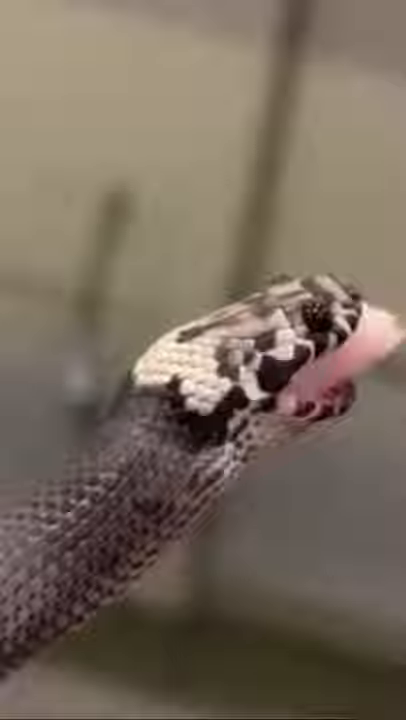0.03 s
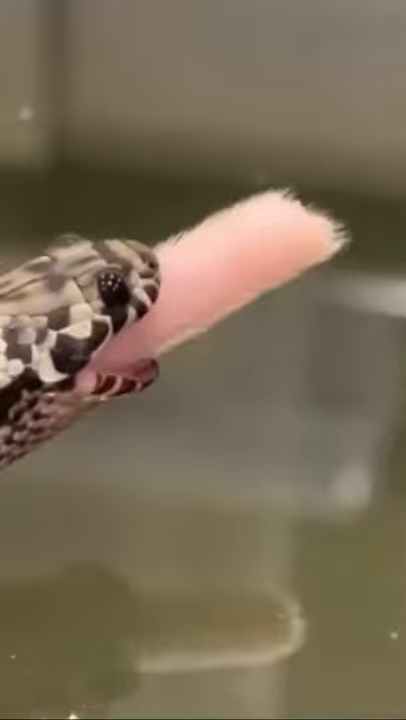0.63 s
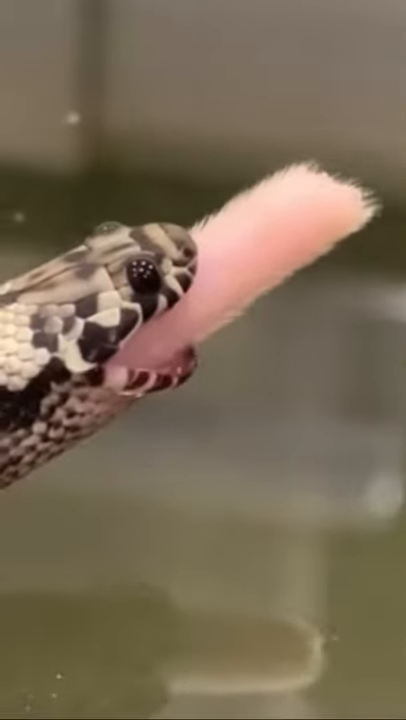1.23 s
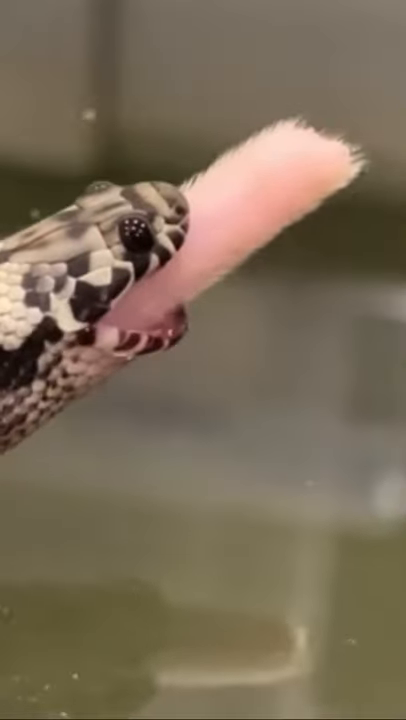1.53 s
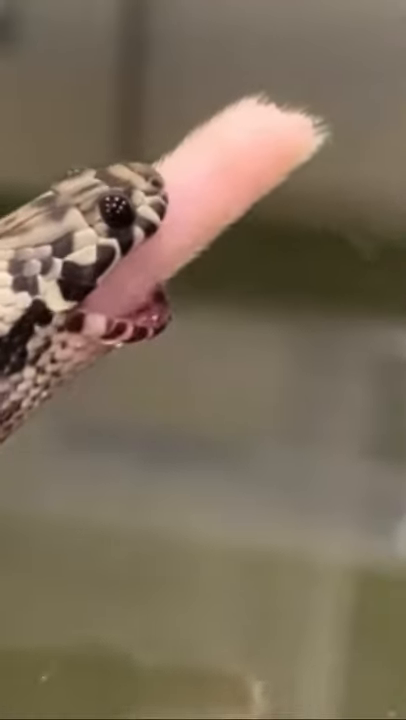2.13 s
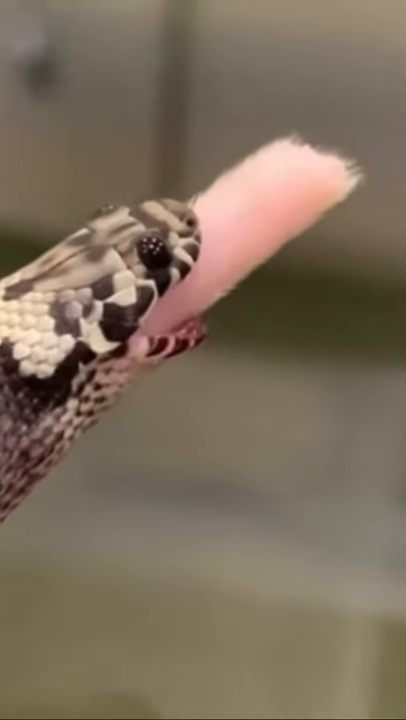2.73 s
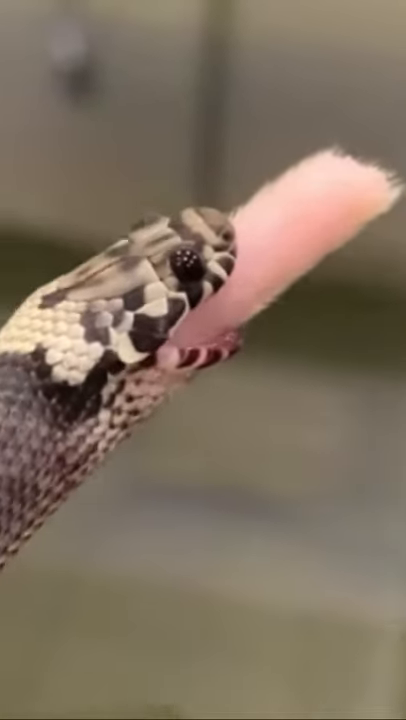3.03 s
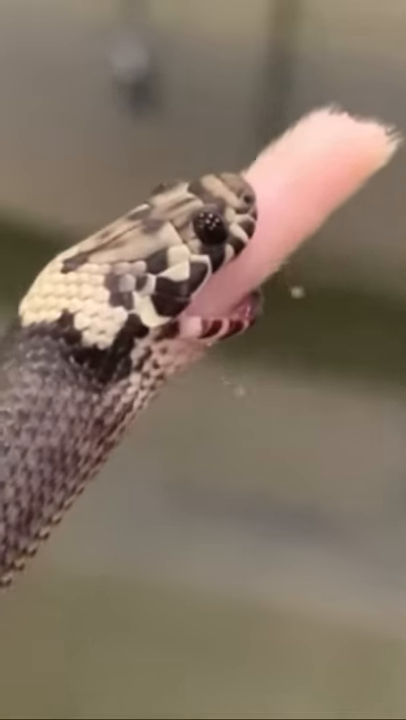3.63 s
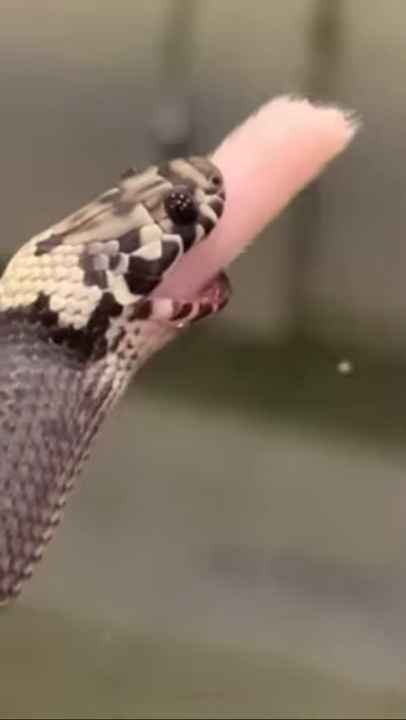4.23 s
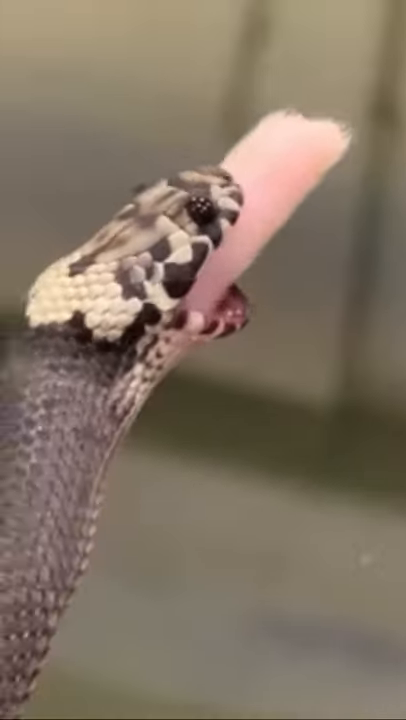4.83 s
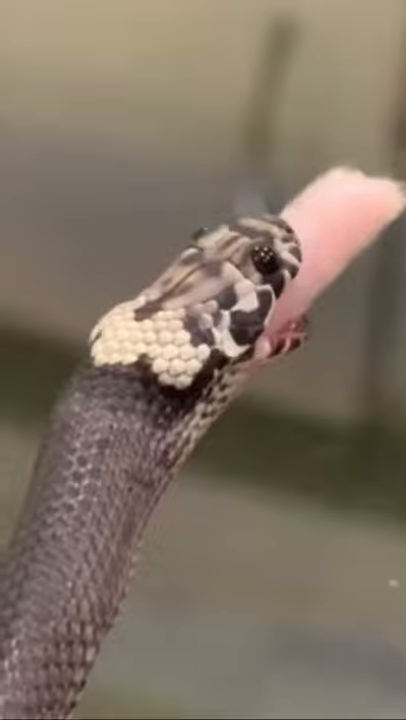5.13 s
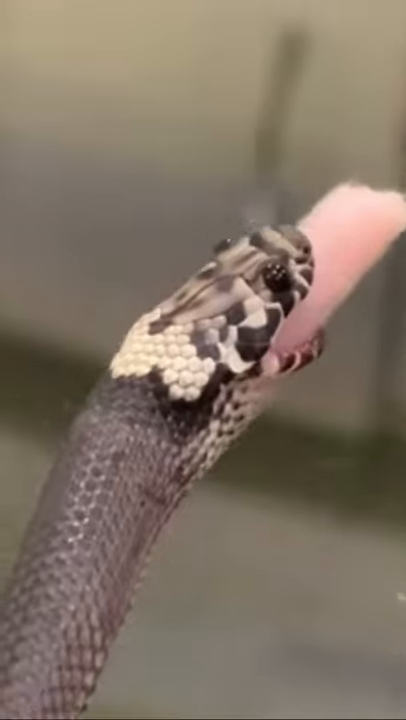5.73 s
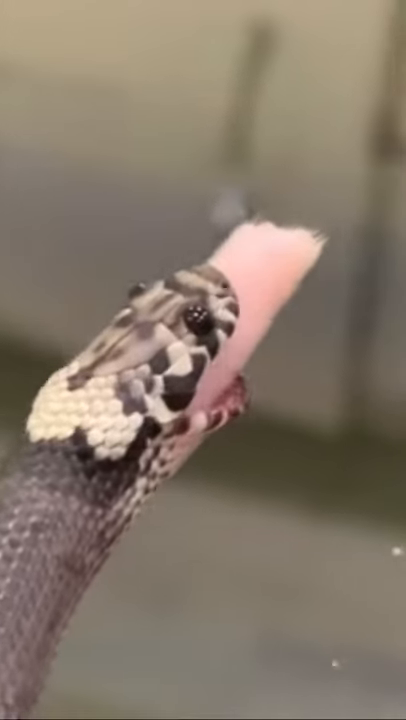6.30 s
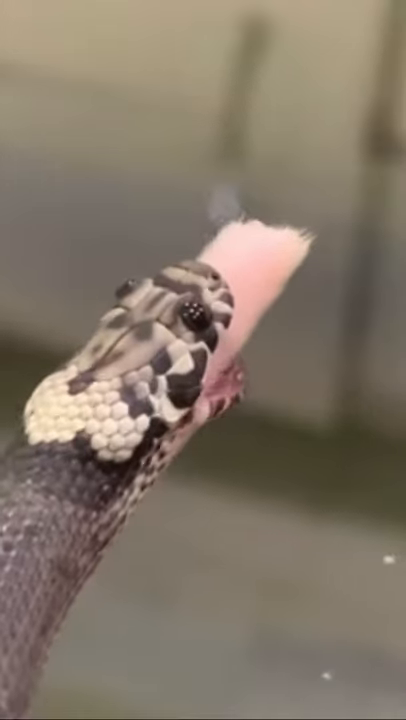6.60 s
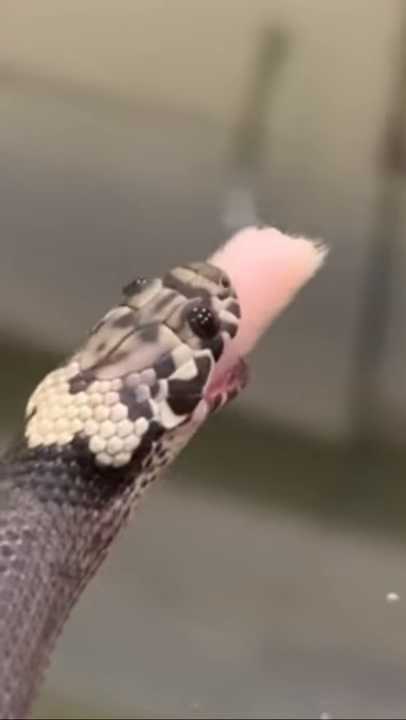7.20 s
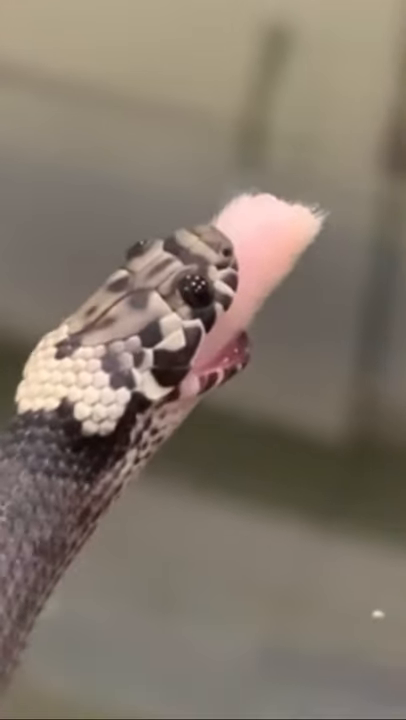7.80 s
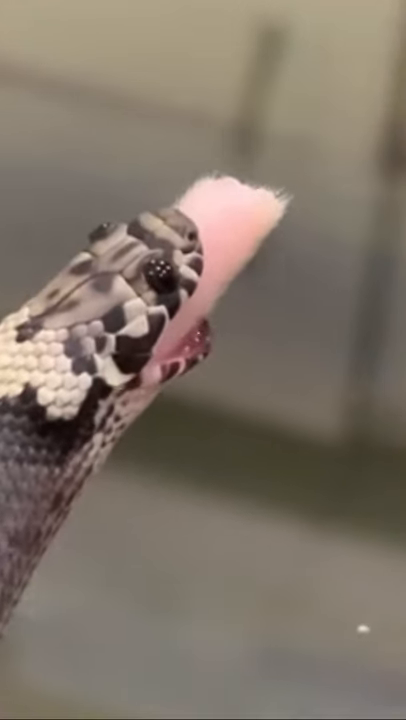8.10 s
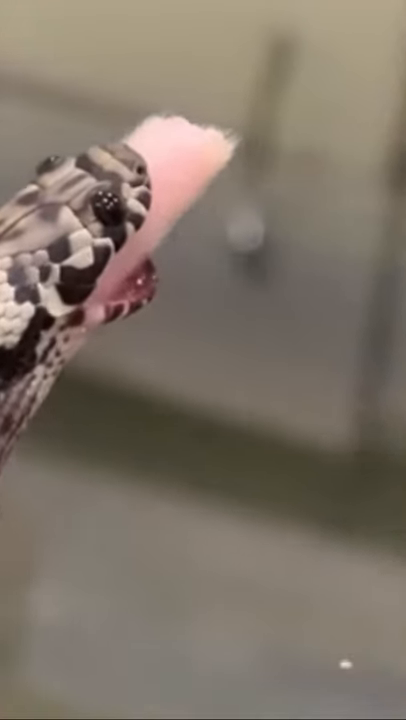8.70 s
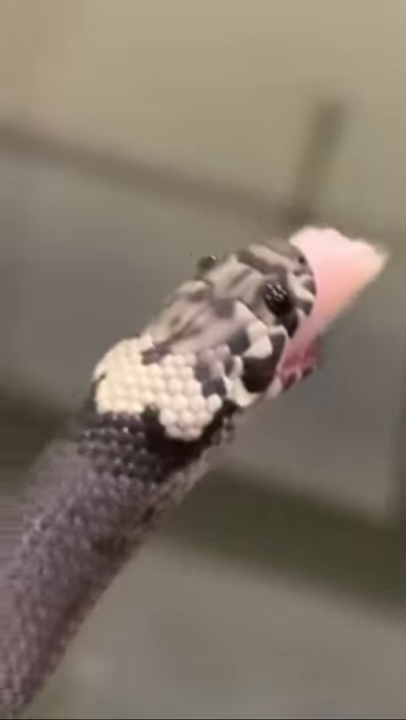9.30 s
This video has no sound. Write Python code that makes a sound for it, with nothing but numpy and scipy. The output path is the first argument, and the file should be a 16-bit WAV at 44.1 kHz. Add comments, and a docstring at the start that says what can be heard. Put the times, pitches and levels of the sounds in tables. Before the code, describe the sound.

A quiet indoor hum with soft knocks, ticks and dull thuds, then a vehicle passes outside with a swelling rumble and tyre roar.

```python
"""A quiet room, where an appliance hums and a small fan rushes softly, heard by two close microphones.
Something knocks softly three times, 2.2 s apart, among dull thuds, faint squeaks and a few ticks,
one of them sharp. Then a vehicle passes outside. Its engine rumble and tyre roar make the room ring
at its own notes (resonances). The hiss is brightest as it goes by, and the roar then drops in pitch."""
import sys
import numpy as np
from scipy import signal
from scipy.fft import rfft, irfft, next_fast_len
from scipy.io import wavfile
from scipy.ndimage import uniform_filter1d

SR = 44100
rng = np.random.default_rng(int(sys.argv[2]) if len(sys.argv) > 2 else 0)


def transcribe(signal):
    """Save signal, clipped to [-1, 1], as a 16-bit WAV file at the path in sys.argv[1]."""
    frames = np.atleast_2d(signal).T
    limited = np.clip(frames, -1, 1)
    pcm = np.round(limited * 32767).astype(np.int16)
    wavfile.write(sys.argv[1], SR, pcm)


N = 412335
FFT_SIZE = next_fast_len(N)
TIME = np.arange(N) / SR
FREQ = np.fft.rfftfreq(FFT_SIZE, 1 / SR)

# the notes at which the room rings: f/Hz, width/Hz, boost/dB
ROOM_RESONANCES = [(114.5, 9.9, 10.5), (165.3, 19, 10), (202, 15, 7), (237.8, 9.8, 8), (278.8, 16.8, 11.5),
                   (330, 46, 1), (375.6, 15, 6), (468.3, 22, 10.5), (514, 14, 9.5), (551, 22, 6),
                   (618, 9.4, 12.5), (665, 60, 6.5), (734.4, 25, 11.5), (768, 27, 8.5), (800.5, 20, 9),
                   (834.3, 21, 10.5), (886, 30, 4.5), (927, 39, 7), (995, 14, 5), (1041, 18, 7),
                   (1165, 14, 7.5), (1560, 14, -4), (2480, 180, 3.5)]
# how alike the microphones hear room and street sound: f/Hz, likeness (1 same, -1 opposite)
ROOM_LIKENESS = [(450, 1), (570, 0.97), (760, 0.25), (1200, 0.25), (1800, -0.11), (3300, -0.25),
                 (4500, 0.55), (5600, -0.85), (6500, 0.39), (7300, -0.83), (8800, 1), (10600, 0.34),
                 (11900, -0.27), (14500, 0)]
STREET_LIKENESS = [(100, 1), (280, 0.94), (480, 0.63), (700, 1), (900, 0.7), (1300, 0.25), (2200, 0.039),
                   (3500, 0.07)]
# how much louder the street is on the left: f/Hz, level/dB
STREET_LEFT_BOOST = [(400, 0), (600, 2.5), (800, 8.5), (1000, 2.5), (1400, 1.5), (3000, -1.5)]
# how much sooner the street is heard on the left: f/Hz, t/s
STREET_LEFT_LEAD = [(150, 0.000062), (380, .00018), (560, 0.00038), (800, 0.00021), (1100, 0.00043),
                    (2200, 0.000398)]

# tone of the room's steady air, far traffic and the building's rumble: f/Hz, relative level/dB
AIR_SPECTRUM = [(15, -105), (36, -89), (50, -85), (78, -80), (125, -85.5), (200, -88.5), (440, -99),
                (680, -102), (1200, -117), (1700, -114), (2200, -120), (6000, -125), (9300, -122),
                (12000, -126), (14500, -129)]
TRAFFIC_SPECTRUM = [(300, -21), (480, 2), (680, -5.5), (880, -3.5), (1100, -14.5), (2000, -36)]
RUMBLE_SPECTRUM = [(18, -24.5), (36, -12), (49, 1), (58, -2.5), (73, 3), (83, -1), (92, 1.5), (130, -12.5),
                   (250, -61.5)]
# moments when the far traffic and the rumble swell: t/s, level/dB, width/s
TRAFFIC_SWELLS = [(0.6, -88, 0.51), (1.42, -78, 0.085), (4.15, -76.5, 0.17), (5.5, -78.5, 0.58),
                  (5.82, -73, 0.086), (6.45, -68, 0.22)]
RUMBLE_SWELLS = [(3.2, -63.5, 0.56), (4.0, -54.5, 0.16)]
# the tones in the hum: multiple of its pitch, relative level/dB
HUM_TONES = [(.5, -66), (1, -49), (1.5, -69)]
# brief dips and lifts of the hum: t/s, level change/dB, width/s
HUM_WAVERS = [(7.5, -3, 0.077), (8.245, 2, 0.099), (8.47, -3, 0.071), (8.924, 6, 0.024)]

# faint squeaks: t/s, level/dB, f/Hz, width/Hz, width/s
SQUEAKS = [(0.298, -83, 6260, 170, 0.018), (0.58, -83, 4700, 130, .022), (7.64, -77, 6000, 220, 0.055)]
# soft thuds: t/s, level/dB, f/Hz
THUDS = [(0.43, -64.5, 430), (1.33, -66, 560), (1.79, -67.5, 490), (2.45, -65, 540), (4.085, -62, 380),
         (5.96, -60, 470)]
# ticks: t/s, relative level/dB
TICKS = [(1.1449, -46), (2.1801, -67), (2.3433, -67), (2.691, -68.5)]
# echoes of each tick: delay/s, relative level/dB
TICK_ECHOES = [(0.0105, -14), (0.015, -10)]
# tone of a tick, a knock's rattle, and the tail each leaves in the room: f/Hz, relative level/dB
TICK_SPECTRUM = [(400, -3), (800, 2), (1500, 0), (2400, 6), (3000, 3), (4100, 6), (5100, -3), (6000, 5),
                 (7500, -8), (10000, -7), (14000, -19)]
TICK_TAIL_SPECTRUM = [(400, -6), (800, 3), (1800, -1), (2700, -3), (4100, 2), (5200, -10), (6200, -4),
                      (8000, -20), (14000, -32)]
RATTLE_SPECTRUM = [(300, -34), (600, -8), (950, -14.5), (1230, -4.5), (1560, -2.5), (1950, -7.5),
                   (2230, -12.5), (2550, -38), (5000, -61)]
KNOCK_TAIL_SPECTRUM = [(350, -18), (550, -3), (900, -6), (1250, 3), (1600, -3), (2100, -12), (2600, -43)]
# soft rattling knocks: t/s, level/dB, extra hollow sound/dB, rise/s
KNOCKS = [(1.6348, -57.5, -1, 0.011), (3.8377, -59, -5, 0.014), (6.0417, -59, -6.5, 0.012)]
# the quick hits within one knock: delay/s, relative level/dB, hollow sound/dB
KNOCK_HITS = [(0.003, 3.5, -4), (0.017, 1.5, 1), (0.041, -3, 1.5), (0.06, -5, -3)]
# the notes each hit rings with: f/Hz, relative level/dB, time to fade by 60 dB/s
KNOCK_NOTES = [(1197, -5, 0.054), (1387, -15, 0.23), (1538, 4.5, 0.076), (1881, 0.5, 0.069)]

# tone of the vehicle's sounds as heard indoors: f/Hz, relative level/dB
ENGINE_SPECTRUM = [(60, -27), (120, -10), (165, -1), (260, -2.5), (380, -4), (500, -13.5), (900, -72)]
TYRE_SPECTRUM = [(250, -23), (470, -5), (580, -7), (665, 2), (735, -3.5), (787, 0), (850, -4.5),
                 (960, -4.5), (1130, -12.5), (1500, -38), (3000, -64)]
ROAD_SPECTRUM = [(600, -17), (950, 4.5), (1100, 3.5), (1400, 4), (1900, 3.5), (2400, -2.5), (2750, -7),
                 (3100, -8), (3900, -11), (4800, -13.5), (7000, -63), (14000, -50)]
SPRAY_SPECTRUM = [(2000, 11.5), (3800, 14), (5000, 0.5), (6500, 6.5), (8000, 1), (10000, -2.5),
                  (14000, -37)]
BUMP_SPECTRUM = [(300, -24), (460, -1.5), (570, 0), (660, -7), (735, 2), (800, 3), (900, 1.5), (1000, -13),
                 (1400, -47)]
# the engine revs and the wheels cross bumps: t/s, level/dB, width/s
ENGINE_REVS = [(7.54, -48.5, 0.026), (8.92, -56, 0.32)]
WHEEL_BUMPS = [(7.41, -57, 0.015), (7.7, -55.5, 0.02), (7.925, -46.5, 0.026), (8.1, -56, 0.03),
               (8.276, -51, 0.016), (8.55, -51, 0.035)]
# short droning surges from the street, the first from far traffic, the rest from the vehicle: t/s, level/dB,
# width/s, f/Hz, width/Hz
DRONES = [(5.069, -68, 0.05, 655, 35), (6.516, -56.5, 0.034, 190, 35), (7.127, -54, 0.13, 843, 9.9),
          (7.4, -57, 0.066, 760, 82), (7.7, -52, 0.025, 720, 16), (7.78, -49.5, 0.042, 160, 13.5),
          (8.326, -53.5, 0.057, 620, 9), (8.594, -49.5, 0.059, 736, 16), (9.23, -53.5, 0.22, 166, 24)]

# when the vehicle is nearest, and how long it takes to drive as far as it then is from the room
CLOSEST_S, CROSSING_S = 7.42, 1.066
EMERGE_START_S, EMERGE_LENGTH_S = 3.95, 2.1  # it comes out from behind cover


def gain_of(db):
    """Turns decibels into a number to multiply a sound by."""
    return 10 ** (np.asarray(db) / 20)


def unit_level(x):
    """Scales a signal to an average (rms) size of 1."""
    return x / np.sqrt(np.mean(x ** 2) + 1e-30)


def curve(points):
    """Joins (f/Hz, value) points into a line, giving each octave equal room."""
    hz, value = np.transpose(points)
    return np.interp(np.log(FREQ + 1), np.log(hz + 1), value)


def shape(spectrum):
    """Turns (f/Hz, level/dB) points into a gain for every frequency."""
    return gain_of(curve(spectrum))


def bell(x, centre, width):
    """A smooth hump of height 1."""
    return np.exp(-.5 * ((x - centre) / width) ** 2)


def swells(rows):
    """A gain that rises and falls smoothly once for each row."""
    return sum(gain_of(db) * bell(TIME, s, width) for s, db, width in rows)


def dying(s, rise, t60):
    """A gain lasting one second: it rises at time s and loses 60 dB every t60 seconds."""
    envelope, age = np.zeros(N), TIME[:SR]
    envelope[round(s * SR):][:SR] = np.minimum(age / rise, 1) * gain_of(-60 * age / t60)
    return envelope


def drift(top_hz):
    """Slow random wandering of average size 1."""
    t = TIME[::256]
    rates = np.geomspace(top_hz / 10, top_hz, 20)
    waves = sum(np.sin(2 * np.pi * (hz * t + rng.random())) for hz in rates)
    return np.interp(TIME, t, unit_level(waves))


def filtered(x, gain):
    """Turns each frequency of a sound up or down by its gain."""
    return irfft(rfft(x, FFT_SIZE) * gain, FFT_SIZE)[..., :N]


def noise(gain, likeness, lead_s=0, left_db=0):
    """Noise at two microphones: partly alike, and perhaps sooner and louder on the left."""
    same = np.clip(likeness, -1, 1)
    left, other = rfft(rng.standard_normal((2, FFT_SIZE)))
    right = (same * left + np.sqrt(1 - same ** 2) * other) * np.exp(-2j * np.pi * FREQ * lead_s)
    pair = np.array([left * gain_of(left_db / 2), right * gain_of(-left_db / 2)])
    return irfft(pair * gain, FFT_SIZE)[:, :N] * np.sqrt(SR / 2)


def room_colour():
    """The gain for each frequency: the room favours its own notes."""
    boosts = sum((gain_of(db) ** 2 - 1) / (1 + (2 * (FREQ - hz) / width) ** 2) ** 2
                 for hz, width, db in ROOM_RESONANCES)
    return np.sqrt(np.abs(1 + boosts))


def indoors(gain):
    """Noise of size 1 from within the room."""
    return unit_level(noise(gain, curve(ROOM_LIKENESS)))


def street_noise(gain):
    """Noise from the street, which lies to the left."""
    return noise(gain, curve(STREET_LIKENESS), curve(STREET_LEFT_LEAD), curve(STREET_LEFT_BOOST))


def outdoors(spectrum, colour, pitch=1):
    """Street noise of size 1, bent in pitch by motion and then coloured by the room."""
    top = np.max(pitch)
    street = street_noise(shape([(hz * top, db) for hz, db in spectrum]))
    position = np.cumsum(pitch / top * np.ones(N))  # a source moving away is heard slowed down
    bent = np.array([np.interp(position, np.arange(N), side) for side in street])
    return unit_level(filtered(bent, colour))


def passing(closest_db, doubling_db, rear_db):
    """Gain of a passing sound: doubling_db less at twice the distance, up to rear_db more behind."""
    along = (TIME - CLOSEST_S) / CROSSING_S
    distance = np.hypot(1, along)
    emerged = np.clip((TIME - EMERGE_START_S) / EMERGE_LENGTH_S, 0, 1)
    return emerged * gain_of(closest_db - doubling_db * np.log2(distance) + rear_db * along / distance)


def room_air(fan_hz=1726, fan_width_hz=123, traffic_db=-84.5):
    """Steady air, the fan's fluttering whirr and the murmur of far traffic."""
    colour = room_colour() ** 0.14  # only a hint of the room's ring
    air = noise(shape(AIR_SPECTRUM) * colour, curve(ROOM_LIKENESS))
    fan = noise(gain_of(-101) * bell(FREQ, fan_hz, fan_width_hz), curve(ROOM_LIKENESS))
    flutter = gain_of(drift(12))
    murmur = np.hypot(gain_of(traffic_db + 2.8 * drift(7)), swells(TRAFFIC_SWELLS))
    return air + fan * flutter + indoors(shape(TRAFFIC_SPECTRUM) * colour) * murmur


def hum(pitch_hz=100, trim_db=-0.82, grow_at_s=5.64, grow_for_s=0.92):
    """An appliance hums at twice the mains frequency, with a weak tone below and another above."""
    angle = 2 * np.pi * (pitch_hz * TIME + 0.0027 * drift(1.1))
    tones = sum(gain_of(db) * np.sin(k * angle + 2 * np.pi * rng.random()) for k, db in HUM_TONES)
    growth_db = 2.4 * np.clip((TIME - grow_at_s) / grow_for_s, 0, 1)
    waver_db = sum(db * bell(TIME, s, width) for s, db, width in HUM_WAVERS) + 0.5 * drift(5)
    return np.sqrt(2) * tones * gain_of(trim_db + growth_db + waver_db)


def bass(rumble_db=-67.5, boom_hz=90.4, spread_rad=0.34):
    """The hum, the building's rumble and the engine's boom, nearly alike at both microphones."""
    vehicle_shake = passing(-56, doubling_db=8.2, rear_db=0.86)
    shaking = np.sqrt(gain_of(rumble_db) ** 2 + swells(RUMBLE_SWELLS) ** 2 + vehicle_shake ** 2)
    boom = passing(-59.5, doubling_db=10, rear_db=3)
    low = hum() + indoors(shape(RUMBLE_SPECTRUM)) * shaking
    low += indoors(bell(FREQ, boom_hz, width=9.5)) * boom
    # left and right slip a little out of step while the vehicle is near
    spread = spread_rad * (boom / boom.max()) ** 2 * np.array([[-.5], [.5]])
    return (signal.hilbert(low, FFT_SIZE)[:, :N] * np.exp(1j * spread)).real


def squeaks():
    """Brief, thin, high rubbing noises."""
    return sum(gain_of(db) * indoors(bell(FREQ, hz, width_hz)) * bell(TIME, s, width_s)
               for s, db, hz, width_hz, width_s in SQUEAKS)


def thuds():
    """Soft, dull bumps somewhere in the building."""
    return sum(gain_of(db) * indoors(bell(FREQ, hz, width=110)) * dying(s, rise=0.02, t60=0.25)
               for s, db, hz in THUDS)


def ticks(ring_db=-13, tail_db=-23):
    """A close snap rings for an instant; nearby surfaces return two echoes and a short, duller tail."""
    colour = shape(TICK_SPECTRUM)
    clicks = np.zeros(N)
    for s, db in TICKS:
        clicks[round(s * SR)] = gain_of(db)
    snaps = filtered(clicks, colour / colour.mean())
    rings = sum(gain_of(db + ring_db + echo_db) * dying(s + delay, rise=0.00016, t60=0.019)
                for s, db in TICKS for delay, echo_db in [(0, 0)] + TICK_ECHOES)
    tails = sum(gain_of(db + tail_db) * dying(s, rise=0.0011, t60=0.14) for s, db in TICKS)
    return snaps + indoors(colour) * rings + indoors(shape(TICK_TAIL_SPECTRUM)) * tails


def knock(rise, body_db, body_hz=680, ring_db=-3, tail_db=-14):
    """A mechanism across the room knocks and bounces; a duller tail lingers."""
    rattle = indoors(shape(RATTLE_SPECTRUM))
    body = indoors(bell(FREQ, body_hz, width=93))
    sound = indoors(shape(KNOCK_TAIL_SPECTRUM)) * gain_of(tail_db) * dying(0, rise=0.03, t60=0.88)
    for delay, db, hollow_db in KNOCK_HITS:
        ring = sum(gain_of(note_db) * dying(delay, rise, t60) * np.sin(2 * np.pi * hz * (TIME - delay))
                   for hz, note_db, t60 in KNOCK_NOTES)
        hit = gain_of(db) * rattle + gain_of(body_db + hollow_db) * body
        echoes = np.roll(hit, round(delay * SR), axis=1) * dying(delay, rise, t60=0.15)
        sound += echoes + gain_of(db + ring_db) * ring
    return sound


def knocks():
    """The knock comes at even intervals, more or less hollow and abrupt."""
    return sum(gain_of(db) * np.roll(knock(rise, body_db), round(s * SR), axis=1)
               for s, db, body_db, rise in KNOCKS)


def drones():
    """Now and then the street traffic, mostly the passing vehicle, sets one of the room's notes singing."""
    return sum(unit_level(street_noise(bell(FREQ, hz, width_hz))) * gain_of(db) * bell(TIME, s, width_s)
               for s, db, width_s, hz, width_hz in DRONES)


def spray(from_s=6.78, to_s=7.78):
    """The hiss of fine spray; more gets in while the vehicle is in line with an opening."""
    opening = (1 + np.tanh((TIME - from_s) / 0.39)) / 2
    closing = (1 - np.tanh((TIME - to_s) / 0.25)) / 2
    in_line = gain_of(-67) * opening * closing
    return indoors(shape(SPRAY_SPECTRUM)) * np.hypot(passing(-81, doubling_db=7.1, rear_db=8.5), in_line)


def vehicle(uneven_db=1.26, ripple_db=3.5, flutter_db=1.2, pitch_drop_s=8.0, rasp_hz=3140):
    """Engine, tyres and road hiss swell as the vehicle nears; bumps make the tyres boom."""
    uneven = gain_of(uneven_db * drift(10))
    pitch = 0.98 - 0.06 * np.tanh((TIME - pitch_drop_s) / 0.3)  # lower as it leaves (Doppler effect)
    colour = room_colour()
    # countless overlapping room resonances make some high notes louder and others softer
    ripple = gain_of(ripple_db * unit_level(uniform_filter1d(rng.standard_normal(len(FREQ)), size=160)))
    engine = outdoors(ENGINE_SPECTRUM, colour)
    engine *= np.hypot(passing(-53.5, doubling_db=12.7, rear_db=2.7), swells(ENGINE_REVS))
    tyres = outdoors(TYRE_SPECTRUM, colour, pitch) * passing(-52, doubling_db=9.3, rear_db=9) * uneven
    road = outdoors(ROAD_SPECTRUM, colour * ripple) * passing(-62.5, doubling_db=10.2, rear_db=4.16)
    road *= gain_of(flutter_db * drift(14))
    hiss = road + spray()
    tyre_rasp = indoors(bell(FREQ, rasp_hz, width=380)) * passing(-81, doubling_db=20, rear_db=14.4)
    bumps = outdoors(BUMP_SPECTRUM, colour) * swells(WHEEL_BUMPS)
    return engine + drones() + tyres + bumps + hiss + tyre_rasp


def scene():
    """All the sounds together."""
    return bass() + room_air() + vehicle() + knocks() + thuds() + ticks() + squeaks()


def record(dry, start_s=0.139, fade_s=0.026, top_hz=14800):
    """The sound fades in quickly after a moment of silence, and the highest treble is cut."""
    faded = dry * np.clip((TIME - start_s) / fade_s, 0, 1)
    treble_cut = signal.firwin(511, top_hz, window=("kaiser", 9), fs=SR)
    return signal.oaconvolve(faded, treble_cut[None], "same")


dry = scene()
out = record(dry)
transcribe(out)
```